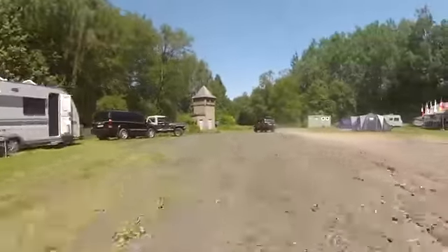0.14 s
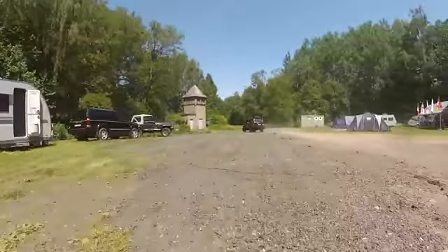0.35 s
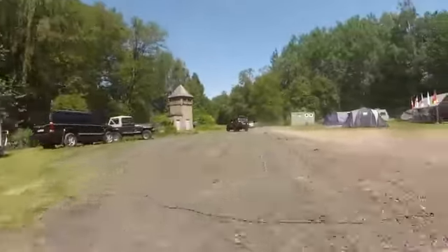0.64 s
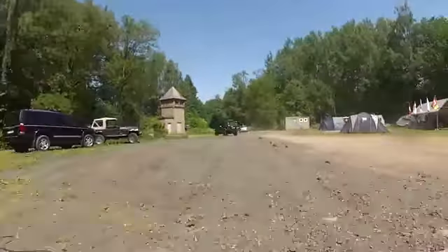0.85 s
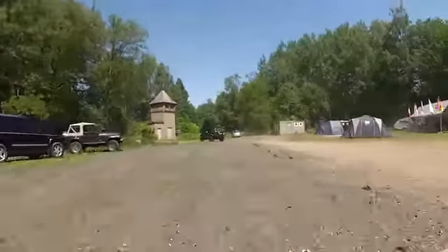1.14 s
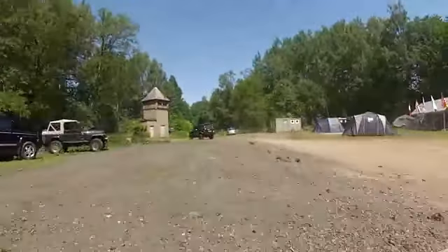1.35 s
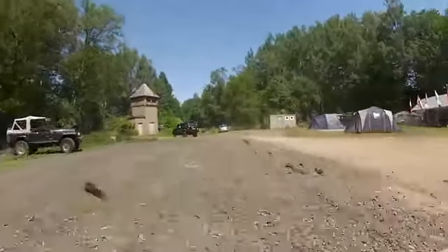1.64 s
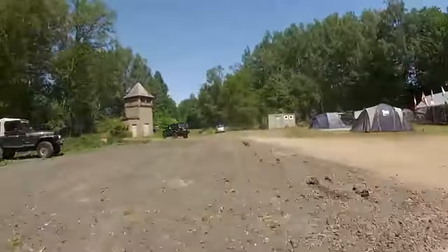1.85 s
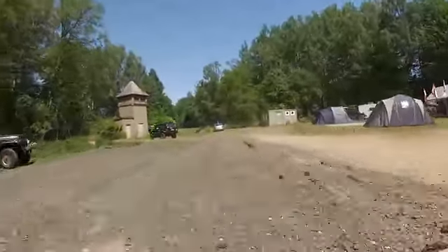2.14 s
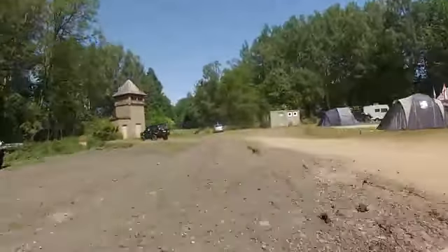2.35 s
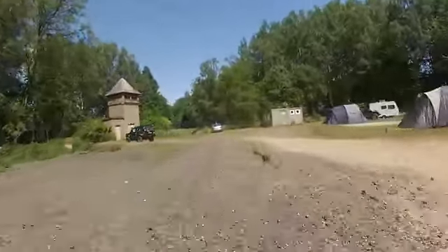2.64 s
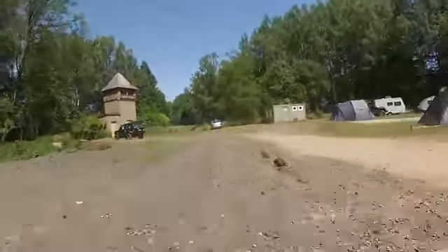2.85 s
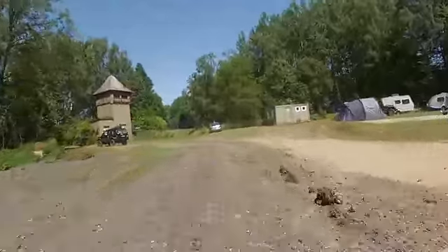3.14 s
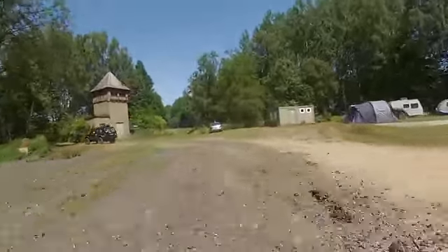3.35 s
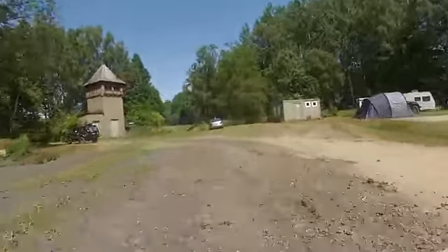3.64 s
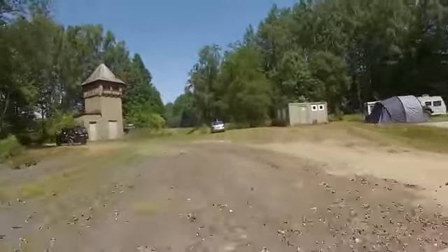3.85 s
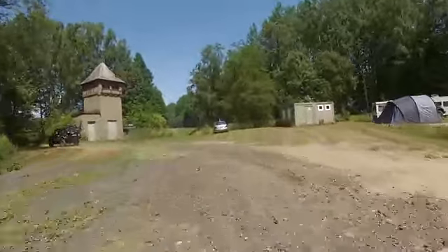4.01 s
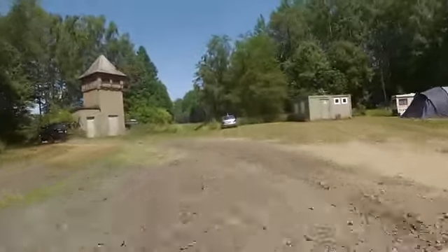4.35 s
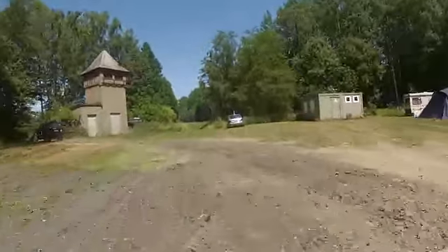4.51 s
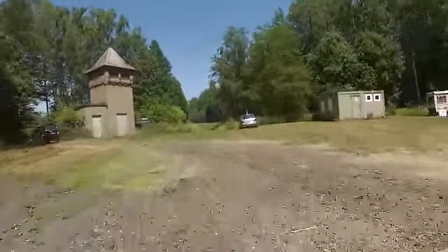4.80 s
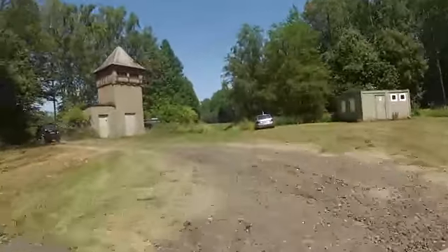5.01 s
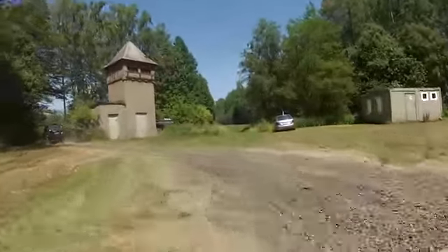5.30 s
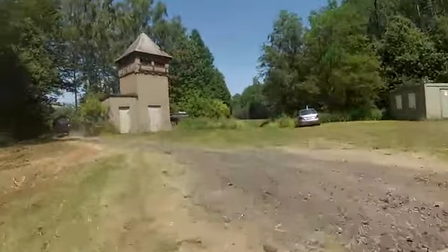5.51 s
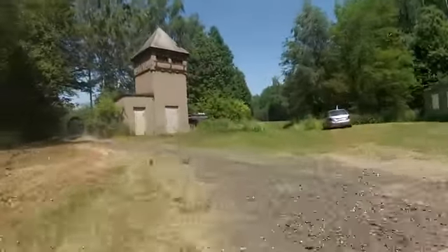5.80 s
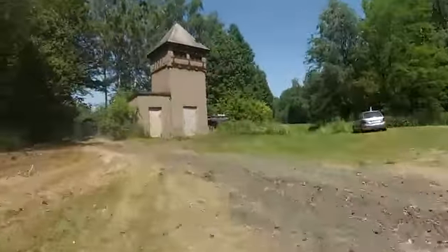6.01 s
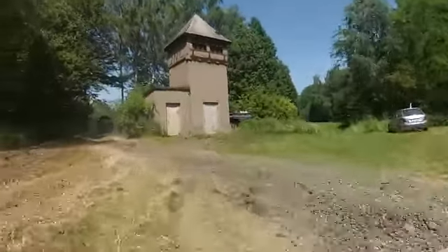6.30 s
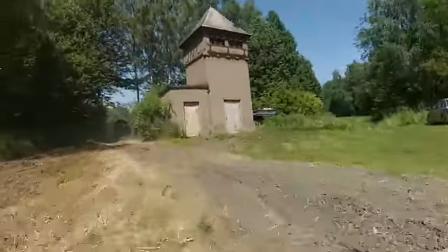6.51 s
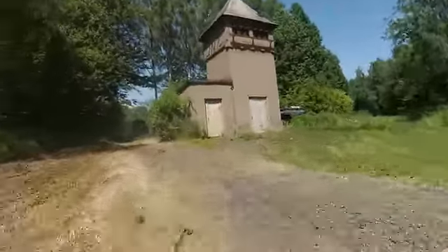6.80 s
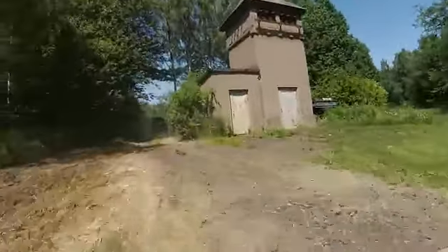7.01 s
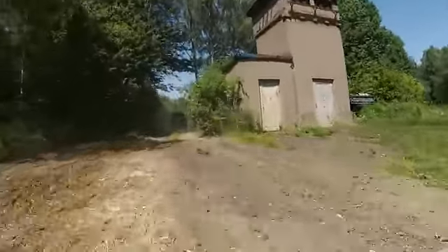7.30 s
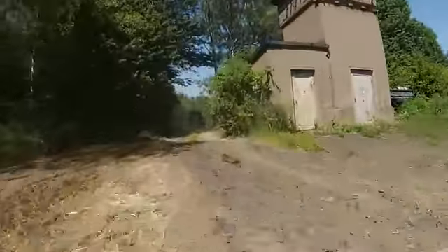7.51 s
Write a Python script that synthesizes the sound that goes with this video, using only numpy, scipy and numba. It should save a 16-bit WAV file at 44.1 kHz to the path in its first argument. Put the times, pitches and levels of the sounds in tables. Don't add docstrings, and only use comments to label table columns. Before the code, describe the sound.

Deep, overloaded low booming from a camera mount on a vehicle jolting over a dirt track, with crackle, thin engine drone, rattling panels and ticking stones.

```python
import sys
import numpy as np
from scipy import signal
from scipy.fft import rfft, irfft, next_fast_len
from scipy.io import wavfile
from scipy.ndimage import uniform_filter1d, minimum_filter1d, map_coordinates
from numba import njit

SR = 44100
rng = np.random.default_rng(int(sys.argv[2]) if len(sys.argv) > 2 else 0)


def master_out(mix):
    frames = np.transpose(np.atleast_2d(mix))
    ceiling = np.clip(frames, -1, 1)
    pcm = np.round(ceiling * 32767).astype(np.int16)
    wavfile.write(sys.argv[1], SR, pcm)


def ratio(d):
    e = np.asarray(d, float) / 20
    return 10 ** e


N = 337806

# (time of the crest [s], level of the crest [dB], ring t60 [s])
KICKS_UP = [(0.0189, -7, 0.1), (0.2595, -10.5, 0.7), (0.3848, -10.5, 0.23), (0.4416, -11, 0.24),
            (0.5329, -10, 0.6), (0.5699, -10, 0.47), (0.962, -10.5, 0.49), (1.5353, -11, 0.52),
            (1.952, -8.5, 0.38), (1.9865, -7.5, 0.15), (2.1703, -9, 0.081), (2.2969, -3, 0.3),
            (2.357, -9, 0.24), (2.4544, -8, 0.15), (2.67, -9.5, 0.21), (2.7939, -10.5, 0.11),
            (2.895, -6.5, 0.14), (3.0749, -8, 0.17), (3.856, -7.5, 0.39), (4.139, -9.5, 0.7),
            (4.7706, -8, 0.7), (4.7894, -10, 0.7), (5.0521, -6.5, 0.37), (5.0889, -8.5, 0.37),
            (5.3098, -9.5, 1.1), (5.7622, -4.5, 0.2), (6.0071, -9, 0.38), (6.0402, -9.5, 0.055),
            (6.132, -11, 0.15), (6.435, -5, 0.45), (6.492, -11.5, 0.11), (6.5292, -12, 0.54),
            (6.5584, -11, 0.15), (6.716, -10.5, 0.14), (6.7472, -6.5, 0.7), (7.2192, -10, 0.53),
            (7.4555, -10, 0.45), (7.584, -7, 0.13), (7.659, -13.5, 0.7)]
KICKS_DOWN = [(0.0111, -12, 0.7), (0.152, -6, 0.64), (0.506, -11, 0.91), (0.6816, -10, 0.4),
              (0.7349, -10, 0.06), (0.7798, -10.5, 0.87), (1.1176, -11.5, 0.7), (1.2673, -9.5, 0.35),
              (1.4224, -13.5, 0.09), (1.4892, -4, 0.29), (1.867, -8.5, 0.75), (2.069, -6.5, 0.69),
              (2.2204, -7, 0.15), (2.2897, -11, 0.7), (2.4042, -11, 0.21), (2.5622, -9, 0.22),
              (2.8678, -6.5, 0.7), (2.94, -7, 0.17), (3.0465, -9.5, 0.7), (3.123, -7.5, 0.32),
              (3.5912, -9.5, 0.12), (3.6577, -10.5, 0.41), (3.6908, -9, 0.14), (3.8513, -5.5, 0.7),
              (4.1494, -10, 0.28), (4.4554, -9.5, 0.18), (4.8173, -6.5, 0.64), (4.8358, -10, 0.7),
              (5.2821, -9.5, 0.72), (6.2076, -7, 0.25), (6.425, -7, 0.7), (6.6431, -10, 0.084),
              (7.5379, -5.5, 0.67), (7.633, -11, 0.84)]
# (time of the crest [s], level of the crest [dB])
NUDGES_UP = [(0.236, -12.5), (0.3177, -14), (0.9043, -12), (2.1142, -12), (2.2338, -14), (2.7423, -15.5),
             (2.7728, -17), (2.9685, -11), (3.0956, -9.5), (3.5441, -10.5), (3.7674, -13.5), (3.9125, -12),
             (4.3811, -10.5), (4.4174, -16), (4.5432, -12.5), (4.6805, -12), (4.826, -9.5), (5.1977, -12),
             (5.2347, -6.5), (6.1979, -10), (6.8423, -12.5), (6.971, -15), (7.2551, -17)]
NUDGES_DOWN = [(0.0961, -10.5), (0.857, -11.5), (1.3258, -13.5), (1.4553, -13), (2.714, -14), (3.413, -12),
               (3.7578, -11.5), (3.8316, -12), (3.9599, -11), (4.2276, -12.5), (4.3908, -12),
               (4.6302, -11.5), (4.9112, -13), (5.3782, -15), (5.7534, -10), (5.8918, -15), (6.1871, -11),
               (6.7038, -13.5), (6.8899, -13), (7.4653, -10.5), (7.501, -11), (7.6145, -12)]
# (time of the first crest [s], time of the last crest [s], level of the crests [dB],
# ring t60 [s], first swing [1 up, -1 down])
WASHBOARD = [(0.1795, 0.1894, -8.5, 0.52, 1), (0.4205, 0.4285, -9.0, 0.7, 1),
             (0.7917, 0.7984, -8.5, 0.69, 1), (0.9322, 0.9401, -9.0, 0.7, -1),
             (1.1372, 1.1449, -8.0, 0.25, -1), (1.1916, 1.2303, -9.5, 0.9, -1),
             (1.4646, 1.4713, -9.5, 0.7, 1), (1.651, 1.6603, -8.0, 0.21, 1), (1.7022, 1.727, -8.5, 0.23, 1),
             (1.8924, 1.8983, -9.5, 0.15, 1), (2.0789, 2.0885, -9.5, 0.57, 1),
             (2.5168, 2.5284, -9.0, 0.54, 1), (3.0168, 3.0266, -8.5, 0.7, 1),
             (3.2724, 3.2939, -9.5, 0.7, 1), (3.3204, 3.3288, -9.0, 0.7, -1),
             (3.3556, 3.3756, -9.0, 0.2, -1), (3.5244, 3.5343, -8.5, 0.29, 1),
             (3.9306, 3.94, -9.0, 0.33, 1), (4.0109, 4.0199, -9.0, 0.28, 1),
             (4.2361, 4.2448, -8.5, 0.33, 1), (4.4875, 4.5071, -9.0, 0.71, 1),
             (4.6405, 4.6601, -9.0, 0.19, 1), (4.8653, 4.8746, -10.0, 0.37, 1),
             (5.2062, 5.2252, -8.5, 0.7, -1), (5.2537, 5.2627, -9.0, 0.7, 1),
             (5.5008, 5.5112, -8.5, 0.45, -1), (5.6415, 5.652, -9.0, 0.15, 1),
             (5.8697, 5.8808, -9.0, 0.15, -1), (5.9189, 5.9283, -9.0, 0.15, 1),
             (6.0729, 6.0829, -10.0, 0.43, 1), (6.2439, 6.2634, -8.5, 0.43, -1),
             (6.605, 6.6166, -8.5, 0.7, -1), (6.774, 6.7947, -9.0, 0.56, -1),
             (7.0597, 7.0691, -8.0, 0.19, -1), (7.1546, 7.1725, -8.0, 0.36, -1),
             (7.3956, 7.4058, -8.0, 0.25, 1), (7.5109, 7.5197, -10.5, 0.7, 1)]
# (time [s], depth [dB])
STILLS = [(1.385, 17), (1.6, 9), (1.815, 9), (2.03, 11), (2.995, 7), (3.17, 10.5), (3.23, 8), (3.49, 9),
          (3.8, 12), (4.09, 3.5), (4.72, 9), (5.42, -1), (5.72, 11), (5.975, 6), (6.16, 6), (6.35, 10),
          (6.93, 4), (7.02, 8), (7.115, 8), (7.36, 7)]
# (time [s], frequency [Hz], level [dB])
AXLE_HOP = [(0, 86.1, -28), (.25, 87.2, -28), (.45, 86, -25), (.65, 86.6, -29), (.78, 93.9, -25.5),
            (.92, 87.9, -26.5), (1.1, 94, -27.5), (1.25, 92, -50.5), (1.8, 88, -52.5), (1.93, 83, -23.5),
            (2.05, 87.4, -42), (2.65, 95, -51), (2.78, 92.66, -22), (2.92, 84.25, -26.5), (3.08, 88, -26),
            (3.2, 90, -46)]
# (time [s], level [dB])
ROAD = [(0.0, -47.5), (0.19, -53.5), (0.89, -48), (1.26, -52.5), (1.71, -50), (2.05, -46.5), (2.45, -50.5),
        (2.88, -48), (3.03, -53), (3.31, -54.5), (3.62, -52.5), (4.65, -52), (5.14, -54), (5.27, -56),
        (5.99, -51), (6.34, -54.5), (6.81, -52.5), (7.66, -53)]
# (time [s], level [dB])
HEAVES = [(.28, -43), (.4, -30), (0.701, -24), (.82, -26.5), (1.04, -26), (1.169, -25.5), (1.34, -37.5),
          (1.419, -12.5), (1.689, -18), (1.92, -20.5), (2.24, -25.5), (2.799, -24), (3.063, -23.5),
          (3.7, -29), (3.859, -23.5), (4.1, -32), (4.44, -29.5), (4.991, -38), (5.899, -30), (6.228, -31),
          (6.418, -25.5), (6.601, -25.5), (6.76, -25), (7.197, -38.5)]
# (frequency [Hz], density [dB per Hz])
CHASSIS = [(15, -23.5), (30, -12.5), (42, -18.5), (74, -24.5), (86, 2), (94, 0), (102, -1.16), (112, -12),
           (130, -18), (160, -31.5), (210, -39), (300, -34), (600, -120)]
# (time [s], level [dB])
ENGINE_LOAD = [(0.0, -54.5), (1.09, -50), (1.38, -58), (1.85, -48.5), (2.33, -54), (2.92, -50), (3.39, -56),
               (3.73, -49), (3.97, -56.5), (4.31, -52.5), (4.78, -58), (5.1, -51.5), (5.5, -56.5),
               (5.89, -52.5), (6.23, -57.5), (6.59, -54.5), (6.93, -56.5), (7.66, -54.5)]
# (frequency [Hz], width [Hz], level [dB])
CABIN_MODES = [(144, 42, -1), (207, 8.4, -4), (250.2, 31, 3.5), (298, 69, -4.5), (360, 50, -1),
               (407.1, 14, 5.5)]
PANEL_MODES = [(1030, 45, -9), (978, 170, -8.5), (1300, 14, -9), (1397, 40, -1), (1482, 350, -6),
               (1965, 60, -3.5), (2152, 54, -1.5), (2400, 120, -12.5), (3300, 510, -20.5), (4760, 44, -33),
               (6300, 150, -38.5)]
HUM_MODES = [(1019.4, 15, 0.5), (1399, 32, -4), (2191, 20, 3.5)]
# (frequency [Hz], density [dB per Hz])
CASE_LEAK = [(100, -72.5), (200, -6), (420, -10), (480, -6.5), (800, -10), (1400, -11.5), (2300, -10.5),
             (2720, -21), (3400, -25), (3850, -29.5), (8000, -37.5), (11000, -40.5), (15000, -75.5)]
# (time [s], frequency [Hz], level [dB])
GEAR_MESH = [(0, 1334, -55), (.45, 1326, -53), (.7, 1390, -47.5), (1.15, 1431, -50.5), (1.25, 1300, -80),
             (1.4, 1267, -42), (1.55, 1280, -62), (2.15, 1346, -48.5), (2.55, 1254, -60.5),
             (2.66, 1407, -67), (2.77, 1392, -45), (3, 1375, -66.5), (5.2, 1409, -56.5), (5.4, 1366, -74),
             (7.66, 1419, -65.5)]
# (time [s], peak level [dB], ring frequency [Hz], snap level [dB], t60 [s])
STONES = [(0.0455, -21, 1720, -25.5, 0.018), (.0472, -27.5, 2160, -20.5, 0.074),
          (.048, -40.5, 4650, -28, 0.046), (2.8267, -35.5, 2100, -5.5, 0.015),
          (2.5615, -38, 1500, -15, .012), (2.889, -38.5, 1650, -34, 0.029), (2.9015, -28, 1980, -36, 0.02),
          (2.903, -33, 1100, -33, 0.027), (2.9275, -23.5, 1500, -6, 0.011),
          (2.928, -34, 1220, -15.5, 0.024), (2.967, -42, 2400, -21, 0.0081),
          (3.0644, -30, 2315, -26, 0.082), (3.063, -40.5, 4700, -23, 0.066), (3.07, -24, 2100, -27, 0.034),
          (3.5107, -32, 1730, -15, 0.019), (3.728, -40, 1250, -10, 0.025), (3.319, -37, 1050, -21, .02),
          (3.93, -39, 750, -25, 0.025), (4.77, -41, 1785, -26, 0.059), (4.553, -40.5, 1220, -36, 0.018),
          (4.455, -41.5, 640, -20, 0.023), (4.236, -44, 3100, -27, 0.028), (5.088, -41, 1390, -27, .015),
          (5.095, -50, 4740, -9, 0.064), (5.421, -58.5, 5150, -8, 0.068), (6.604, -34.5, 1300, -20, 0.018),
          (5.669, -35.5, 1100, -37, 0.072), (5.676, -36, 1930, -29, 0.04), (6.748, -39.5, 2780, -24, 0.026),
          (7.196, -43, 1420, -20, 0.02), (7.235, -44.5, 1060, -31, 0.1)]
# (frequency [Hz], level [dB])
CASE_MODES = [(1600, -20), (2046, -11), (2430, -12), (3700, -25), (4680, -30.5)]
# (time [s], peak level [dB])
TICKS = [(0.1235, -49), (0.3057, -53), (0.4633, -54), (0.4734, -66), (0.8824, -53), (1.0016, -52),
         (1.2413, -56), (1.3884, -59), (1.6212, -62), (2.1254, -54), (2.7413, -50.5), (3.729, -50),
         (3.7654, -52), (3.8846, -55), (3.907, -47), (4.117, -47.5), (4.19, -56), (4.364, -50),
         (4.5815, -55), (4.7421, -52), (4.9377, -48), (5.0994, -48), (5.1891, -55), (5.2342, -43),
         (5.4909, -45), (5.774, -49), (5.8576, -57), (6.8967, -48.5), (7.144, -51), (7.3327, -45.5),
         (7.4756, -47), (7.563, -51.5)]
# (time [s], peak level [dB], t60 [s], brightness [dB])
RUTS = [(0.712, -23, 0.098, -14), (0.954, -27, 0.12, -5), (1.344, -33.5, 0.41, -7.5),
        (1.391, -19.5, 0.099, -9), (1.592, -37, 0.15, 2), (1.669, -20.5, 0.091, -8), (1.877, -32, 0.13, 4),
        (2.193, -31.5, 0.18, -12.5), (3.014, -34, 0.28, -0.5), (3.813, -31, 0.14, -13.5),
        (4.134, -35.5, 0.045, -22.5), (6.338, -48, 0.54, 0), (6.504, -36, 0.12, -30),
        (6.715, -28.5, 0.16, -4.5)]
# (time [s], frequency [Hz], level [dB])
SQUEAK = [(1.33, 3060, -79), (1.36, 3110, -66), (1.39, 3300, -44.5), (1.42, 3180, -58.5), (1.5, 3270, -58),
          (1.55, 3350, -59.5), (1.58, 3400, -70), (1.61, 3420, -65), (1.632, 3450, -51), (1.655, 3230, -56),
          (1.69, 3390, -55), (1.73, 3400, -74)]
# (time [s], length [s], frequency [Hz], level [dB])
GROANS = [
    (1.422, .1, 234.8, -37.5),
    (1.608, 0.098, 247.6, -34),
    (1.931, .17, 306.7, -47),
    (2.049, .27, 208, -40.5),
    (2.106, .14, 250.2, -42.5),
    (2.25, 0.058, 365, -42.5),
    (6.35, 0.11, 407.4, -46.5),
    (7.253, .1, 409.6, -49.5),
]

MOUNT_HZ, REST_DB, OVERSHOOT_DB = 52.62, -17, -1
WINDUP_S, HELD_S, NUDGE_T60_S = 0.007, 30, 0.6
LULL_DB, LULL_S = 1, 0.035
STILL_S = 0.024
POINTED = 0.018
SWING_TOP_DB = -11.6
DUCK_SHARE = 0.8
FIRING_HZ, FIRING_DB = 32.67, -22.5
CHASSIS_GROWS, CHASSIS_DB = 0.14, -33.5
DRONE_GROWS, DRONE_DB = 0.32, 1.16
HEAVE_RISE_S, HEAVE_FALL_S = 0.028, 0.049
HEAVE_BUZZ_DB = 16
BRACKET_HZ, BRACKET_WIDTH_HZ = 598, 19
BRACKET_DB, BRACKET_GROWS = -62, 1.5
SNAP_TOP_HZ, SNAP_DB_PER_OCTAVE = 7800, 20.5
SHELL_DB, SHELL_GROWS = -3.5, 0.25
TICK_T60_S, TICK_DB = 0.0089, -8.5
LIMIT_DB, STEP_DB, RECOVER_S = -10.6, 0.35, 0.02
LAG = 45


def unit(x):
    return x / np.sqrt(np.mean(x ** 2) + 1e-20)


def curves(rows):
    s, *columns = np.transpose(rows)
    return [np.interp(np.arange(N) / SR, s, column) for column in columns]


def wobble(rate):
    coarse = np.arange(0, N + 16, 16)
    knots = rng.standard_normal(N // 400)
    return np.interp(np.arange(N), coarse, map_coordinates(knots, [coarse * rate / SR]))


def noise(response, patchy_db):
    z = signal.stft(rng.standard_normal(N), nperseg=512)[2]
    field = uniform_filter1d(rng.standard_normal(z.shape), size=4, axis=0)
    field = uniform_filter1d(field, size=8, axis=1)
    x = signal.istft(z * ratio(patchy_db * unit(field)), nperseg=512)[1][:N]
    m = next_fast_len(N + SR // 2)
    return unit(irfft(rfft(x, m) * response(np.fft.rfftfreq(m, 1 / SR)), m)[:N])


def slope(points):
    f, db = np.transpose(points)
    return lambda hz: ratio(np.interp(np.log(hz + 1), np.log(f + 1), db))


def peaks(modes):
    def response(hz):
        power = sum(ratio(db) ** 2 / (1 + ((hz - centre) / (width / 2)) ** 2) ** 1.2
                    for centre, width, db in modes)
        return np.sqrt(power)
    return response


def kicks():
    rows = [(*row, 1) for row in KICKS_UP] + [(*row, -1) for row in KICKS_DOWN]
    rows += [(first, db, HELD_S, way) for first, _, db, _, way in WASHBOARD]
    rows += [(last, db, t60, 0) for _, last, db, t60, _ in WASHBOARD]
    rows += [(*row, NUDGE_T60_S, 1) for row in NUDGES_UP]
    rows += [(*row, NUDGE_T60_S, -1) for row in NUDGES_DOWN]
    return np.transpose(sorted(rows))


def half_swings(spans, ways):
    total, out = 0, []
    for span, way in zip(spans, ways):
        step = max(round(span), 1)
        if way and (total + step) % 2 != (way < 0):
            step += 1 if span > step or step == 1 else -1
        total += step
        out.append(total)
    return np.array(out)


def mount():
    s, peak_db, t60, way = kicks()
    t = np.arange(N) / SR
    crest = np.minimum((s * SR).astype(int), N - 1)

    halves = np.cumsum(2 * MOUNT_HZ * (1 + 0.017 * wobble(4) + 0.023 * wobble(18)) / SR)
    whole = half_swings(np.diff(halves[crest], prepend=0), way)
    halves += uniform_filter1d(np.interp(np.arange(N), crest, whole - halves[crest]), size=300)

    last = np.maximum(np.searchsorted(s - WINDUP_S, t) - 1, 0)
    ring_db = (peak_db - OVERSHOOT_DB)[last] - 60 * np.maximum(t - s[last], 0) / t60[last]
    ahead = np.append(s[1:] - WINDUP_S, 2 * N / SR)[last] - t
    lull_db = LULL_DB * np.exp(-(ahead / LULL_S) ** 2) * (t60[last] < HELD_S)
    lull_db += sum(db * np.exp(-((t - at) / STILL_S) ** 2) for at, db in STILLS)
    ring = np.maximum(ratio(ring_db), ratio(REST_DB)) * ratio(-lull_db)
    ring = uniform_filter1d(ring, size=400) * ratio(wobble(22))

    surge = np.zeros(N)
    surge[crest] = ratio(peak_db + 0.67)
    surge = -minimum_filter1d(-surge, size=420)
    surge = uniform_filter1d(uniform_filter1d(surge, size=200), size=200)
    swing = np.maximum(ring, surge) * np.cos(np.pi * halves)
    return swing + POINTED * surge * np.cos(3 * np.pi * halves)


def near_kicks():
    marks = np.zeros(N)
    marks[np.minimum((kicks()[0] * SR).astype(int), N - 1)] = 1
    for first, last, *_ in WASHBOARD:
        marks[int(first * SR):int(last * SR)] = 1
    return marks


def eased(swing):
    free = minimum_filter1d(-near_kicks(), size=260) < 0
    need = np.where(free, 1, np.minimum(1, ratio(SWING_TOP_DB) / (np.abs(swing) + 1e-9)))
    return swing * uniform_filter1d(minimum_filter1d(need, size=240), size=240)


def ducked():
    crests = -minimum_filter1d(-near_kicks(), size=500)
    return 1 - DUCK_SHARE * uniform_filter1d(crests, size=300)


def axle():
    hz, db = curves(AXLE_HOP)
    fade = np.clip((AXLE_HOP[-1][0] - np.arange(N) / SR) / 0.13, 0, 1)
    return fade * ratio(db + 1.4 * wobble(8.6)) * np.sin(np.cumsum(2 * np.pi * hz / SR))


def roughness():
    db, = curves(ROAD)
    return db - db.mean(), db.mean()


def heaves():
    s, db = np.transpose(HEAVES)
    t = np.arange(-SR // 4, SR // 2) / SR
    shape = np.where(t < 0, np.exp(-(t / HEAVE_RISE_S) ** 2), np.exp(-np.abs(t) / HEAVE_FALL_S))
    throws = np.bincount((s * SR).astype(int), ratio(db), N)
    return np.abs(signal.fftconvolve(throws, shape)[SR // 4:][:N])


def engine():
    turn = np.cumsum(2 * np.pi * FIRING_HZ * (1 + 0.04 * wobble(3)) / SR)
    line = np.sin(turn) + ratio(-13.0) * np.sin(3 * turn)
    line *= ratio(FIRING_DB + 2.2 * wobble(5) + 0.84 * wobble(23))
    shake = ratio(CHASSIS_DB + CHASSIS_GROWS * roughness()[0] + 2.6 * wobble(8)) + heaves()
    return line + shake * ratio(0.67 * wobble(12)) * noise(slope(CHASSIS), patchy_db=-1.0)


def panels():
    rough_db, mean_db = roughness()
    rough_db = rough_db + 20 * np.log10(1 + ratio(HEAVE_BUZZ_DB) * heaves())
    buzz_db = rough_db + mean_db + 0.41 + 0.5 * wobble(7.8)
    drone_db = curves(ENGINE_LOAD)[0] + DRONE_DB + DRONE_GROWS * rough_db + 0.52 * wobble(5.1)
    jolt = 1.3 * np.tanh(wobble(45))

    buzz = ratio(1.8 * jolt + 1.6 * wobble(90) + 0.3) * noise(peaks(PANEL_MODES), patchy_db=1.1)
    hum = ratio(-4.5 + 0.4 * jolt + 0.67 * wobble(12)) * noise(peaks(HUM_MODES), patchy_db=-0.4)
    leak = ratio(4.1 * jolt - 4.5) * noise(slope(CASE_LEAK), patchy_db=-2.5)
    whine = np.zeros(N)
    for hz in (9111, 9135):
        level = ratio(-33 + 2.5 * wobble(8))
        whine += level * np.sin(np.cumsum(2 * np.pi * (hz + 4 * wobble(5)) / SR))

    drone = ratio(drone_db + 4.0 + 0.68 * jolt + 0.26 * wobble(25))
    drone *= noise(peaks(CABIN_MODES), patchy_db=1.5)
    bracket = ratio(BRACKET_DB + BRACKET_GROWS * rough_db + 1.1 * wobble(13))
    bracket *= noise(peaks([(BRACKET_HZ, BRACKET_WIDTH_HZ, 0)]), patchy_db=2.5)
    hiss_shape = slope([(2000, -29.5), (4000, -5.5), (9000, -0.5), (12000, -9), (13200, -26), (14000, -70)])
    hiss = ratio(-79) * noise(hiss_shape, patchy_db=1.5)
    return ratio(buzz_db) * (buzz + hum + leak + whine) + drone + bracket + hiss


def gears():
    hz, db = curves(GEAR_MESH)
    turn = np.cumsum(2 * np.pi * hz / SR)
    rough = np.cumsum(rng.normal(0, 0.023, (2, N)), axis=1)
    sideband = ratio(-4.0) * np.sin(1.055 * turn + rough[1])
    return ratio(db + 1.9 * wobble(25)) * (np.sin(turn + rough[0]) + sideband)


def stones():
    out, t = np.zeros(N + SR), np.arange(SR // 5) / SR
    for s, db, hz, snap_db, t60 in STONES:
        smear = uniform_filter1d(np.cumsum(rng.normal(0, hz / 30000, len(t))), size=12)
        ring = np.sin(2 * np.pi * hz * t + smear) * (1 - np.exp(-t / 0.00036))
        for mode_hz, mode_db in CASE_MODES:
            level = ratio(mode_db + SHELL_DB + SHELL_GROWS * (snap_db + 21) + rng.normal(0, 9.1))
            rough = uniform_filter1d(np.cumsum(rng.normal(0, 0.083, len(t))), size=16)
            ring += level * np.sin(2 * np.pi * mode_hz * t + rough)
        snap_hz = SNAP_TOP_HZ * 2 ** (snap_db / SNAP_DB_PER_OCTAVE)
        band = signal.butter(2, np.array([0.66, 1.35]) * snap_hz / (SR / 2), "band")
        snap = unit(signal.lfilter(*band, rng.standard_normal(len(t))))
        snap *= ratio(snap_db + 2.0 - 60 * t / (1.04 * t60))
        out[round(s * SR):][:len(t)] += ratio(db) * (ring * ratio(-60 * t / t60) + snap)
    return out[:N]


def ticks():
    out, t = np.zeros(N + SR), np.arange(SR // 50) / SR
    band = signal.butter(2, np.array([4500, 10500]) / (SR / 2), "band")
    for s, db in TICKS:
        tick = unit(signal.lfilter(*band, rng.standard_normal(len(t))))
        out[round(s * SR):][:len(t)] += ratio(db + TICK_DB - 60 * t / TICK_T60_S) * tick
    return out[:N]


def ruts():
    out, t = np.zeros(N + SR), np.arange(SR // 2) / SR
    for s, db, t60, bright_db in RUTS:
        r = rng.standard_normal(3)
        pan = np.sin(2 * np.pi * 247 * (1 + 0.014 * r[0]) * t)
        high = np.sin(2 * np.pi * 358 * (1 + 0.033 * r[1]) * t)
        high += np.sin(2 * np.pi * 415 * (1 + 0.0035 * r[2]) * t)
        high *= ratio(bright_db - 4.0 - 60 * t / 0.36)
        swell = (1 - np.exp(-t / 0.013)) * ratio(-60 * t / t60)
        out[round(s * SR):][:len(t)] += ratio(db + 8.5) * swell * (pan + high)
    return out[:N]


def squeak():
    hz, db = curves(SQUEAK)
    t = np.arange(N) / SR
    on = (t > SQUEAK[0][0]) & (t < SQUEAK[-1][0])
    scrape = np.cumsum(rng.normal(0, [[0.07], [0.045], [0.07]], (3, N)), axis=1)
    ratios = np.array([[0.95], [1], [1.045]])
    strands = np.sin(ratios * np.cumsum(2 * np.pi * hz / SR) + scrape)
    tone = (ratio([[-10], [0], [-9]]) * strands).sum(axis=0)
    return on * ratio(db - 3.0 + 2.5 * wobble(92)) * tone


def groans():
    out = np.zeros(N + SR)
    for s, length, hz, db in GROANS:
        t = np.arange(int(length * SR)) / SR
        drift = np.cumsum(0.015 * rng.standard_normal(len(t)))
        swell = np.abs(np.sin(np.pi * t / t[-1])) ** 0.52
        out[round(s * SR):][:len(t)] += ratio(db + 1.5) * swell * np.sin(2 * np.pi * hz * t + drift)
    return out[:N]


def scene():
    swing = eased(mount() + axle() + ducked() * engine())
    body = ratio(-1.21) * (panels() + gears()) + ruts() + groans() + squeak()
    return (swing + body + stones() + ticks())[None]


@njit
def grab(over_db, steps_db, waits, keep):
    out, gain_db, wait = np.zeros(len(over_db)), 0.0, 0.0
    for i in range(len(over_db)):
        gain_db, wait = gain_db * keep, wait - 1
        if wait < 0 and over_db[i] + gain_db > 0:
            gain_db, wait = gain_db - steps_db[i], waits[i]
        out[i] = gain_db
    return out


def band_limit(x):
    return signal.sosfilt(signal.butter(12, 15800, fs=SR, output="sos"), x)


def record(dry):
    keep = np.exp(-1 / (RECOVER_S * SR))
    over_db = 20 * np.log10(np.abs(dry[0]) + 1e-9) - LIMIT_DB
    gain_db = grab(over_db, STEP_DB * rng.uniform(0.3, 1.7, N), rng.uniform(16, 30, N), keep)
    gain_db = np.pad(gain_db, (LAG, 0))[:N]
    lone_steps = (rng.random(N) < 60 / SR) * rng.uniform(0.014, 0.057, N)
    gain_db -= signal.lfilter([1], [1, -keep], lone_steps)
    lowpass = signal.butter(2, 13500 / (SR / 2))
    return band_limit(signal.lfilter(*lowpass, dry * ratio(gain_db)))


dry = scene()
out = record(dry)
master_out(out)
```